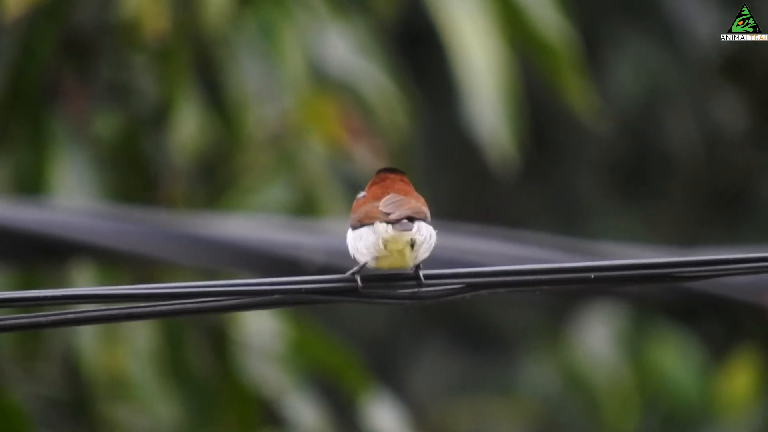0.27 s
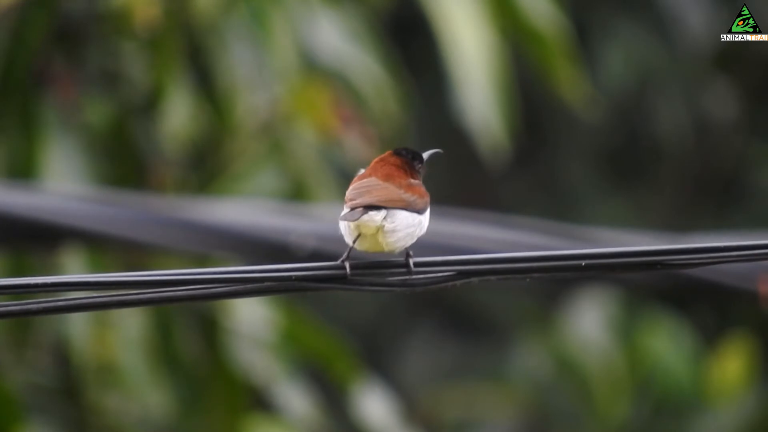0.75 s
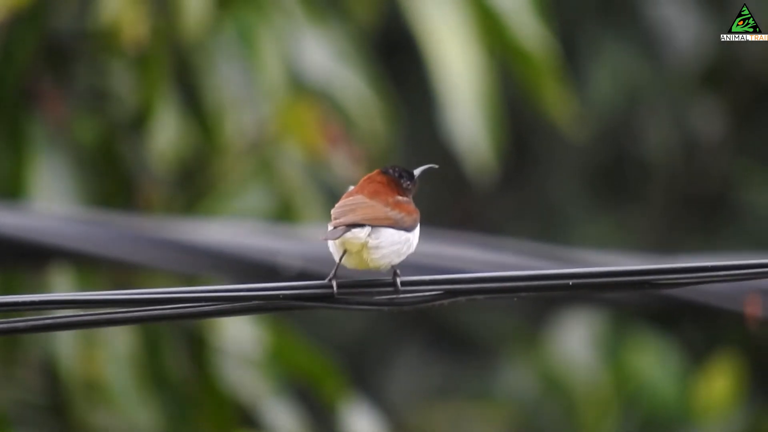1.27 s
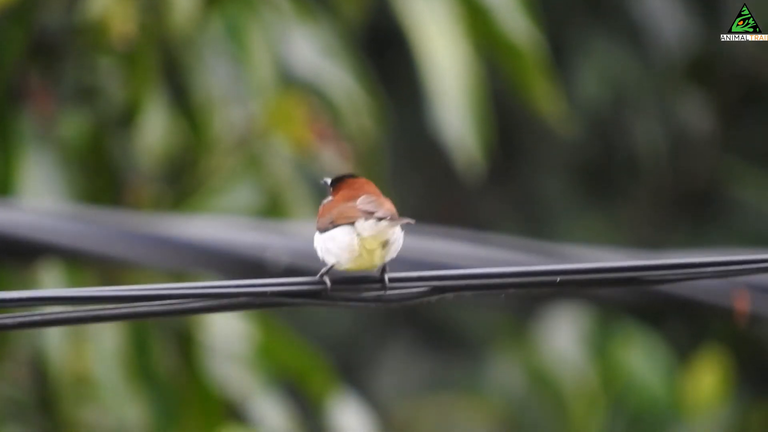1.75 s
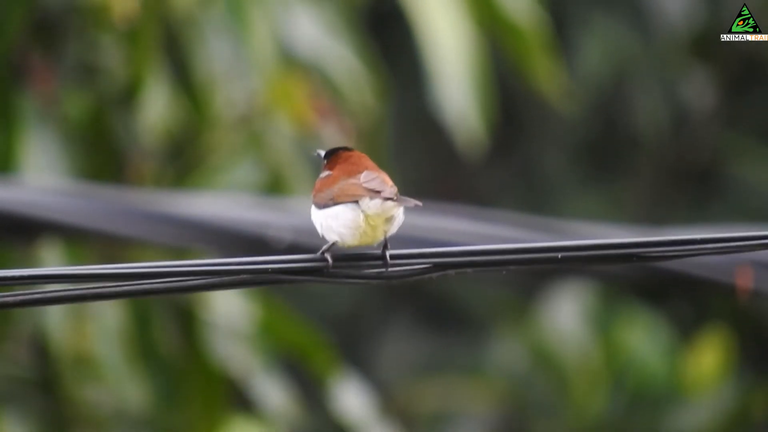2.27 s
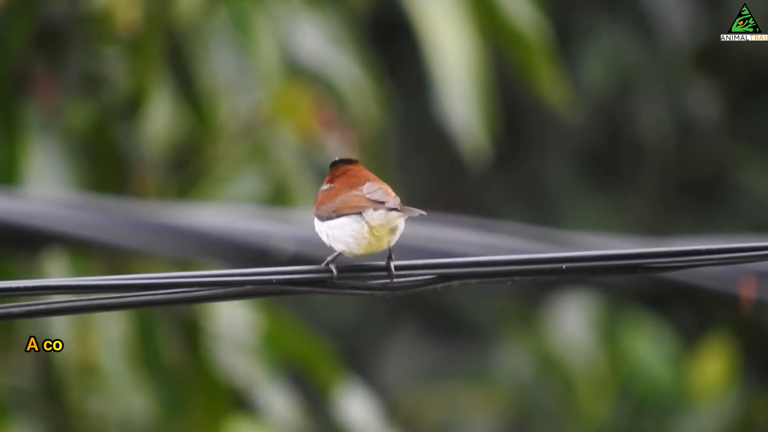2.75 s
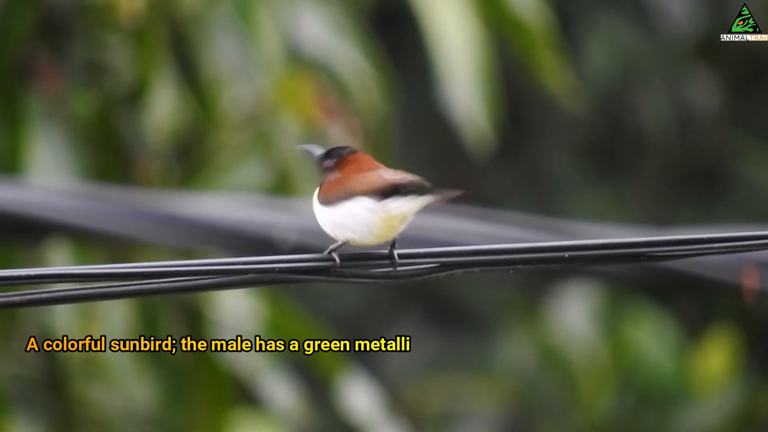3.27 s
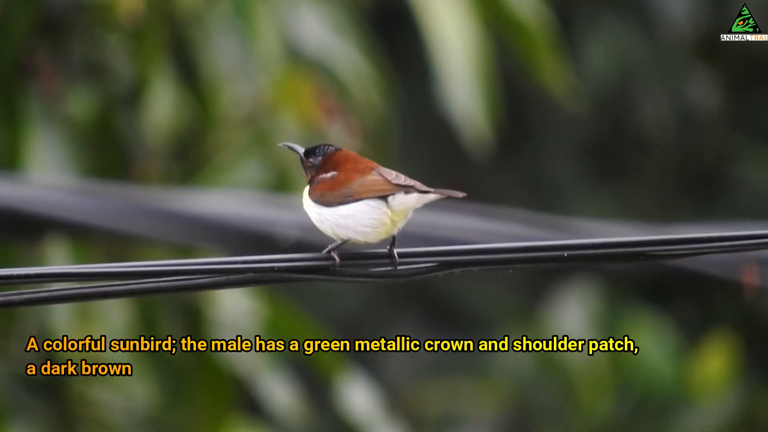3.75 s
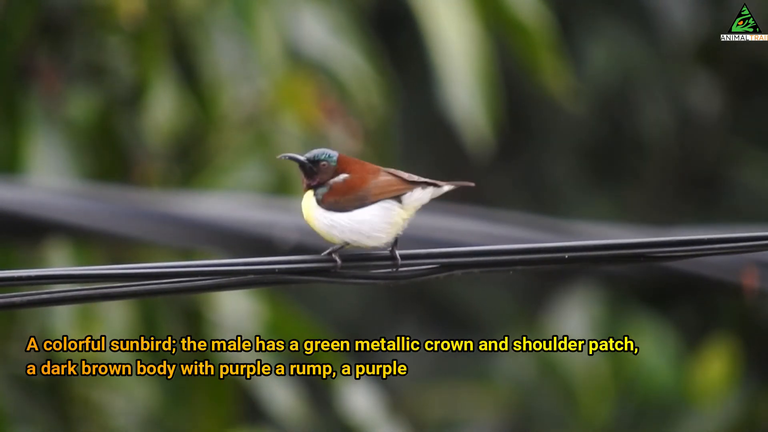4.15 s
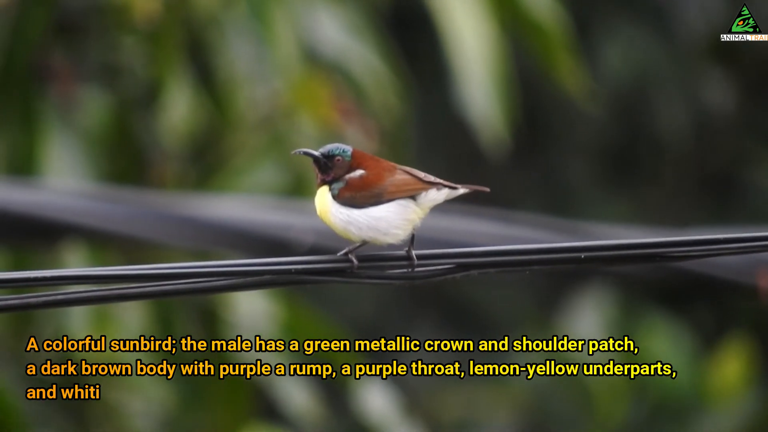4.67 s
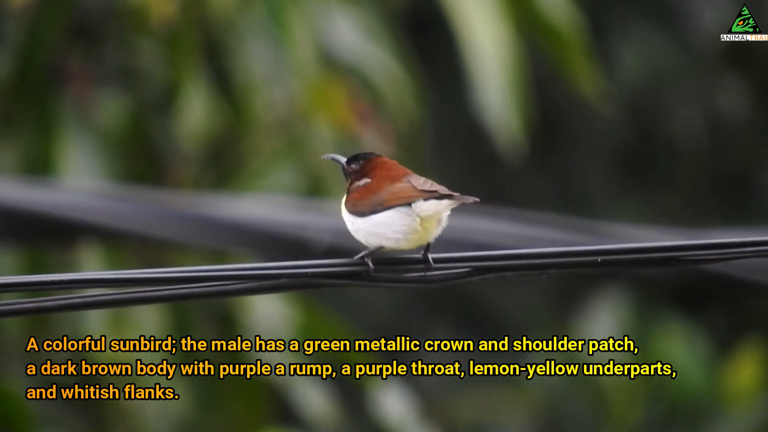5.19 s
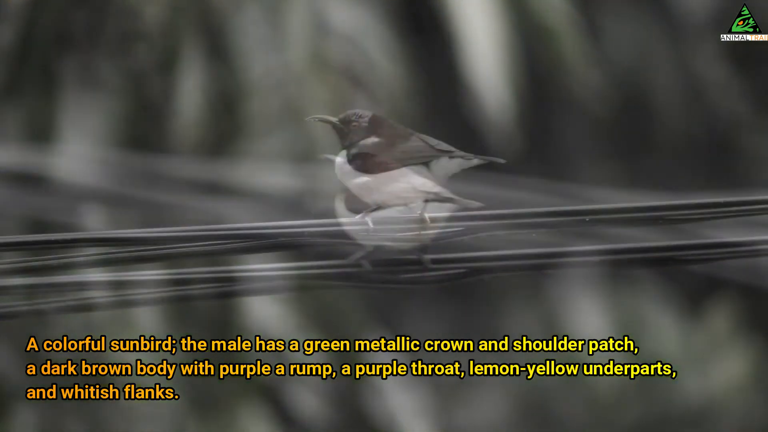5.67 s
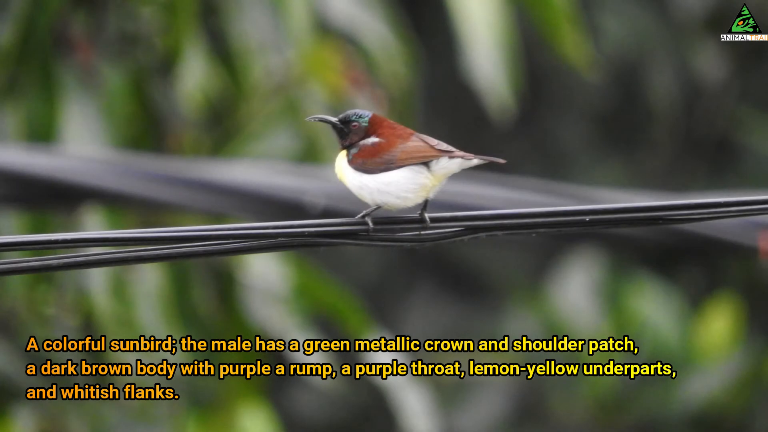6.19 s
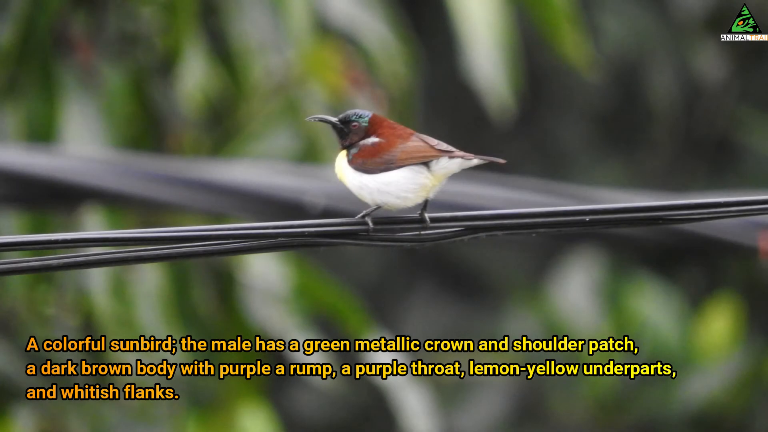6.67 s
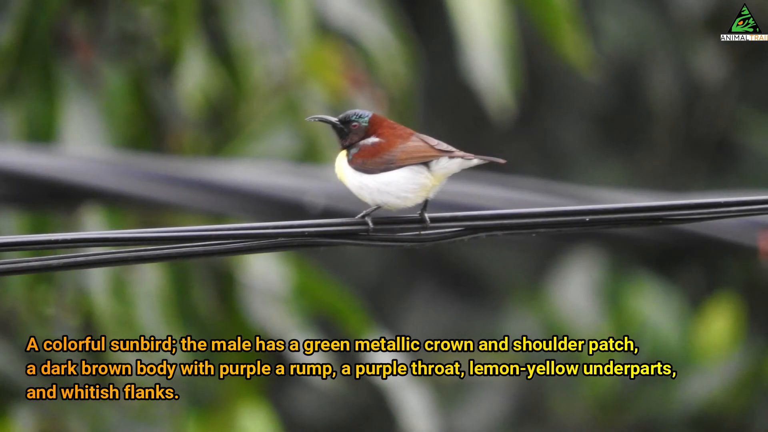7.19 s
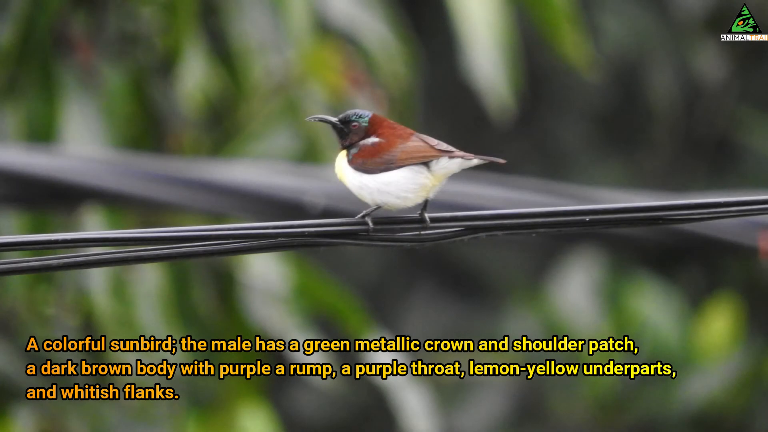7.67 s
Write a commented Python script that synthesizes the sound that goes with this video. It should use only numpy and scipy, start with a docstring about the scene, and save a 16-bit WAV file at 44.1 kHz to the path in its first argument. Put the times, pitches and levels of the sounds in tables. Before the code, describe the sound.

A small bird close by sings three brief bursts of very high, scratchy twitters, each a double stutter with thin whistle and sharp hook, then a chip. The second and third are louder and end in a clear downward slur. Another bird answers softly far away, blurred by echoes. Quiet garden air, low rumble and faint electric hum continue beneath. Outdoor microphone, mono, mostly dry near bird, top treble dulled.

```python
"""In a garden a sunbird on a wire sings three quick phrases of raspy upsweeps, whistles, hooks, chips and slurs.
Each note is a frequency-modulated sine that slides to a held pitch and may droop, under an attack and release.
Impulse responses of discrete echoes and decaying noise stand for nearby surfaces, foliage and far walls.
Behind it are a second, distant bird as the same kind of sines, outdoor air as shaped noise,
an electric hum as wavering sine lines, one of them beating, and a faint far-off whine that comes and goes."""
import sys
import numpy as np
from scipy import signal
from scipy.fft import rfft, irfft
from scipy.io import wavfile
from scipy.ndimage import uniform_filter1d

SR = 44100
rng = np.random.default_rng(int(sys.argv[2]) if len(sys.argv) > 2 else 0)


def store_wav(level_fs):
    """Save 16-bit WAV to argv[1]."""
    pcm = np.round(np.clip(np.atleast_2d(level_fs), -1, 1) * 32767)
    wavfile.write(sys.argv[1], SR, pcm.T.astype(np.int16))


N = 349699


def undb(db):
    """Logarithmic level: decibels become an amplitude ratio."""
    return 10 ** (np.asarray(db) / 20)


def level(x, db):
    """Root-mean-square level: scale a signal to a given rms in dB."""
    return x * undb(db) / np.sqrt(np.mean(x ** 2))


def walk(rate):
    """Low-pass random modulation: values held 1 / rate s and smoothed twice, with a spread near 1."""
    hold = max(int(SR / rate), 1)
    steps = np.repeat(rng.standard_normal(N // hold + 1), hold)
    slewed = uniform_filter1d(uniform_filter1d(steps, hold), hold)
    return 1.3 * slewed[:N]


def tone(hz):
    """Frequency modulation: a sine of amplitude 1 whose phase sums the pitch curve."""
    return np.sin(2 * np.pi * np.cumsum(hz) / SR)


def add(out, x, start):
    """Superposition: mix x into out from a time in seconds."""
    i = max(int(start * SR), 0)
    out[i:i + len(x)] += x[:len(out) - i]


def later(start, ms):
    """Time shift: the time in seconds some milliseconds after a start."""
    return start + ms / 1000


# Spectrum of outdoor air: (frequency [Hz], relative density [dB per Hz])
AIR_SPECTRUM = [(24, -39), (40, -5), (69, -9.5), (97, -6), (146, -6.5), (190, -5), (221, -7.5), (298, -5.5),
                (325, -10.5), (535, -7), (583, -8), (678, -11), (3910, -12.5), (5890, -13), (7000, -25.5),
                (9100, -64), (15400, -120)]
AIR_DB = -58  # rms level of the air
# Swells of the low rumble: (time [s], width [s], rise [dB])
RUMBLE_SWELLS = [(1.67, 0.1, 4), (4.2, .08, 3.5), (4.99, 0.055, 6.5), (7.35, 0.11, 2)]


def air(swell_db=0.39, unrest_db=0.54, rumble_hz=420, sheen_hz=3850, sheen_width_hz=220, sheen_db=4.5):
    """Spectral shaping: filtered noise makes a hiss with a narrow sheen over a rumble that comes and goes."""
    f = np.fft.rfftfreq(N, 1 / SR) + 1  # the added 1 Hz keeps the logarithm finite
    hz, db = np.transpose(AIR_SPECTRUM)
    sheen = sheen_db * np.exp(-((f - sheen_hz) / sheen_width_hz) ** 2)
    shape_db = np.interp(np.log(f), np.log(hz), db) + sheen
    spectrum = rfft(rng.standard_normal(N)) * undb(shape_db)
    low_share = 1 / (1 + (f / rumble_hz) ** 4)
    t = np.arange(N) / SR
    surge = unrest_db * walk(7)
    for at, width, rise in RUMBLE_SWELLS:
        surge += rise * np.exp(-((t - at) / width) ** 2)
    rumble = irfft(spectrum * low_share, N) * undb(surge - surge.mean())
    hiss = irfft(spectrum * (1 - low_share), N) * undb(swell_db * walk(2.2))
    return level(rumble + hiss, AIR_DB)


BUZZ_HZ, BUZZ_DB = 99.8, -72  # the strongest hum line; rms level includes its twin
BEAT_S, BEAT_LOW_S, BEAT_DB = 2.1, 0.74, -6.5  # period, time of a low point, level of the twin against the line
# Steady hum lines: (frequency [Hz], rms level [dB])
HUM_LINES = [(50, -79.5), (200, -76.5), (252, -76), (300, -73.5), (360, -79), (600, -77.5), (1785, -76),
             (2982, -78)]
# Far-off whine: (start [s], end [s], frequency [Hz], rms level before the fades [dB])
WHINE_SPELLS = [(4.598, 7.298, 577, -73.5), (4.945, 5.518, 1156, -72.5), (6.137, 6.53, 573.5, -69.5),
                (6.901, 7.323, 1150, -74.5)]


def hum(waver_db=1.0, drift=0.00087):
    """Beating: two close sines swell and cancel, among wavering hum lines and a far whine that comes and goes."""
    t = np.arange(N) / SR
    phase = 2 * np.pi * np.cumsum(BUZZ_HZ * (1 + drift * walk(5.1))) / SR
    twin = undb(BEAT_DB) * np.sin(phase + 2 * np.pi * (t - BEAT_LOW_S) / BEAT_S)
    out = level(np.sin(phase) - twin, BUZZ_DB)
    for hz, db in HUM_LINES:
        line = tone(hz + walk(12)) * undb(waver_db * walk(3.7))
        out += level(line, db)
    for start, end, hz, db in WHINE_SPELLS:
        fade = np.clip(np.minimum(t - start, end - t) / 0.028, 0, 1)
        whine = tone(hz * (1 + drift * walk(24))) * undb(waver_db * walk(8.0))
        out += fade * level(whine, db)
    return out


def reflect(echoes):
    """Specular reflection: one second of impulse response holding a few single echoes."""
    response = np.zeros(SR)
    for ms, db in echoes:
        response[int(ms * SR / 1000)] += undb(db)
    return response


def scatter(db, t60, onset_s):
    """Diffuse reverberation: countless small reflections build up and decay by 60 dB per t60 s."""
    t = np.arange(SR) / SR
    decay = np.exp(-np.log(1000) * t / t60)
    build_up = 1 - np.exp(-t / onset_s)
    tail = rng.standard_normal(SR) * decay * build_up
    return tail * undb(db) / np.linalg.norm(tail)


# Close reflections: (delay [ms], level against the direct sound [dB])
CLOSE_ECHOES = [(3.7, -11.5), (6.8, -14)]
# Far walls: (delay [ms], level before the distant gain [dB])
FAR_WALLS = [(45, -7.5), (110, -4)]


def garden(song, distant_db):
    """Convolution: direct sound, close reflections that beat against the glides, then distant trees and walls."""
    close = reflect(CLOSE_ECHOES) + scatter(db=-14.5, t60=.11, onset_s=.002)
    close[0] += 1  # the direct sound
    faces = scatter(db=-3.5, t60=0.04, onset_s=.002)  # uneven faces blur part of each echo
    walls = reflect(FAR_WALLS)
    walls = walls + signal.fftconvolve(walls, faces)[:SR]
    trees = scatter(db=2.0, t60=0.54, onset_s=.012)
    return signal.fftconvolve(song, close + undb(distant_db) * (walls + trees))[:N]


FADE_DB = 26.5  # depth of attack and release


def contour(ms, length_ms, start_hz, held_hz, settle_ms, attack_ms, release_ms, droop_hz=0, droop_ms=1):
    """Exponential glide: pitch (Hz) slides, holds and droops; level (dB) rises, holds and falls."""
    left = length_ms - ms
    slide = (start_hz - held_hz) * np.exp(-ms / settle_ms)
    droop = droop_hz * np.maximum(1 - left / droop_ms, 0) ** 2
    fade = np.maximum(1 - ms / attack_ms, 0) + np.maximum(1 - left / release_ms, 0)
    return held_hz + slide - droop, -FADE_DB * fade


def sing(kind, notes, waver=0.0071, flutter_db=2.5, edge_ms=0.43):
    """Self-sustained oscillation: the syrinx sings one kind of note, unsteady in pitch and air pressure."""
    out, pitch_walk, pressure_walk = np.zeros(N), walk(700), walk(450)
    for start, note_db, shift, length in notes:
        t = np.arange(0, kind["length_ms"] * length, 1000 / SR)  # ms
        here = int(start * SR) + np.arange(len(t))
        hz, db = contour(t / length, **kind)
        glide = (hz + shift) * (1 + waver * pitch_walk[here])
        loudness = undb(note_db + db + flutter_db * pressure_walk[here])
        edges = np.clip(np.minimum(t, t[-1] - t) / edge_ms, 0, 1)
        add(out, tone(glide) * loudness * edges, start)
    return out


# Kinds of note, by name: (length_ms [ms], start_hz [Hz], held_hz [Hz], settle_ms [ms], attack_ms [ms],
# release_ms [ms]); the slur also has (droop_hz [Hz], droop_ms [ms])
WHISTLE = dict(length_ms=41, start_hz=6600, held_hz=6920, settle_ms=8, attack_ms=5, release_ms=6)
HOOK = dict(length_ms=29, start_hz=7550, held_hz=5980, settle_ms=10, attack_ms=9, release_ms=14)
SLUR = dict(length_ms=114, start_hz=7500, held_hz=4740, settle_ms=24, attack_ms=12.5, release_ms=47, droop_hz=1350, droop_ms=57)
# The far bird's notes: (time [s], level [dB], pitch shift [Hz], length [ratio])
FAR_WHISTLES = [(5.344, -52.5, -130, 0.91), (5.470, -56, 62, 0.75), (5.598, -62, 20, 0.725)]
FAR_HOOKS = [(.995, -47.5, -52, 1.6), (2.582, -57, 22.5, 1.5), (5.377, -46.5, -50, 1.54),
             (5.527, -43.5, -71, 1.7), (5.682, -42.5, -46, 1.5), (5.775, -59, 22, 1)]
FAR_SLURS = [(2.756, -49, 130, 0.99), (5.952, -47.5, 129.3, 0.99)]


def far_bird():
    """Attenuation with distance: a second bird puts in soft whistles, hooks and slurs at low levels."""
    return sing(WHISTLE, FAR_WHISTLES) + sing(HOOK, FAR_HOOKS) + sing(SLUR, FAR_SLURS, waver=0.022)


def throat(x, hz=5900, width_hz=2600):
    """Resonance: windpipe and open beak favour a broad band."""
    f = np.fft.rfftfreq(N, 1 / SR)
    return irfft(rfft(x) / np.sqrt(1 + (2 * (f - hz) / width_hz) ** 4), N)


def raspy(kind, notes, rasp_db):
    """Irregular modulation: a sweep and a rattle that lingers as a grainy haze, shaped by the throat."""
    stroke = sing(kind, notes, waver=.028, flutter_db=3)
    rattle = sing(kind, notes, waver=.11, flutter_db=3.0)
    haze = signal.fftconvolve(rattle, scatter(db=rasp_db, t60=0.098, onset_s=0.00087))[:N]
    return throat(stroke + haze, hz=5600, width_hz=6000)


# More kinds of note, columns as for the whistle
UPSWEEP = dict(length_ms=11, start_hz=3900, held_hz=7400, settle_ms=7.5, attack_ms=4, release_ms=3.2)
BURR = dict(length_ms=32, start_hz=4570, held_hz=5950, settle_ms=13, attack_ms=3.6, release_ms=5)
# Upsweeps of one stutter: (time into the twitter [ms], relative level [dB], pitch shift [Hz], length [ratio])
STUTTER = [(2.93, -10.5, -150, 1.5), (10, -3, 30, .85), (17.94, 0.5, -31, 1), (27.4, -9.5, 99, 1.1)]
WHISTLE_AT_MS, BURR_AT_MS, HOOK_AT_MS = 39, 44, 73  # into the twitter
BURR_DB = -20.5  # against the stutter
# Twitters: (time [s], stutter level [dB], whistle level [dB], hook level [dB], whistle pitch shift [Hz],
# hook pitch shift [Hz], hook length [ratio])
TWITTERS = [(.626, -21.5, -25, -17.5, 55.5, -78, 1), (0.806, -19, -25, -16.5, -40.5, -130, 1),
            (2.881, -16.5, -35.5, -14.5, -130, -29.5, .78), (3.047, -14, -31, -9.5, 10.5, -59.5, 0.96),
            (4.554, -16, -25.5, -13, -260, 19.5, 0.72), (4.721, -14, -32, -11, -40.5, 53, 0.85)]


def twitters(whistle_length=.85):
    """Sequential modulation: raspy upsweeps, a thin whistle over a lower, rough burr, then a loud hook."""
    sweeps, whistles, burrs, hooks = [], [], [], []
    for start, stutter_db, whistle_db, hook_db, whistle_shift, hook_shift, hook_length in TWITTERS:
        for ms, db, shift, length in STUTTER:
            sweeps.append((later(start, ms), stutter_db + db, shift, length))
        whistles.append((later(start, WHISTLE_AT_MS), whistle_db, whistle_shift, whistle_length))
        burrs.append((later(start, BURR_AT_MS), stutter_db + BURR_DB, 0, 1))
        hooks.append((later(start, HOOK_AT_MS), hook_db, hook_shift, hook_length))
    stutter = raspy(UPSWEEP, sweeps, rasp_db=-10.5)
    burr = sing(BURR, burrs, waver=.06, flutter_db=2.5)
    return stutter + burr + sing(WHISTLE, whistles) + sing(HOOK, hooks)


# The chip, columns as for the slur
CHIP = dict(length_ms=35, start_hz=3500, held_hz=5090, settle_ms=4.5, attack_ms=10.5, release_ms=11, droop_hz=1700, droop_ms=18)
# Chips: (time [s], level [dB], pitch shift [Hz], length [ratio])
CHIPS = [(1.141, -19, 13, 1.12), (3.227, -13, 39.5, 0.87), (4.899, -14, -11, 1.02),
         (5.306, -16.5, 183, 0.98)]
FLICK_LEAD_MS, FLICK_DB, FLICK_LENGTH = 8.5, -29.5, 1.4  # lead before the chip, level, length ratio


def chips():
    """Arched frequency modulation: a soft raspy upward flick leads into each rising and drooping chip."""
    flicks = [(later(row[0], -FLICK_LEAD_MS), FLICK_DB, 0, FLICK_LENGTH) for row in CHIPS]
    return raspy(UPSWEEP, flicks, rasp_db=-7.5) + sing(CHIP, CHIPS, waver=0.016)


# The tick, columns as for the whistle
TICK = dict(length_ms=12, start_hz=5900, held_hz=7040, settle_ms=2.5, attack_ms=2, release_ms=4)
# Loud falling slurs, then ticks between notes: (time [s], level [dB], pitch shift [Hz], length [ratio])
SLURS = [(3.363, -10, 49.5, 0.96), (5.037, -10.5, -57, 0.95)]
TICKS = [(0.528, -48.5, -1200, .8), (3.328, -38.5, -200, .86), (5.001, -49, -26, .9)]


def sunbird():
    """Superposition of notes: phrases of two twitters and a chip, the later two with a long slur; small ticks."""
    return twitters() + chips() + sing(SLUR, SLURS, waver=.006) + sing(TICK, TICKS, waver=0.028)


def scene():
    """Direct-to-reverberant ratio: the far bird is heard more through its echoes than the near one."""
    background = air() + hum()
    far = garden(far_bird(), distant_db=-9)
    near = garden(sunbird(), distant_db=-28.0)
    return (background + far + near)[None]


TOP_HZ = 15700  # upper band limit of the recorder


def record(dry, edge_hz=7150, steepness=28, bend=0.00066, hiss_db=-87):
    """Saturation and band limiting: peaks round, treble above 7 kHz is lost; slight distortion and hiss join."""
    rounded = dry / (1 + (dry / .85) ** 8) ** (1 / 8)
    f = np.fft.rfftfreq(N, 1 / SR)
    dull = irfft(rfft(rounded) / np.sqrt(1 + (f / edge_hz) ** (2 * steepness)), N)
    bent = dull + bend * dull ** 2
    noisy = bent + undb(hiss_db) * rng.standard_normal(dry.shape)
    band_limit = signal.ellip(10, .1, 70, TOP_HZ, fs=SR, output="sos")
    return signal.sosfilt(band_limit, noisy)


dry = scene()
out = record(dry)
store_wav(out)
```